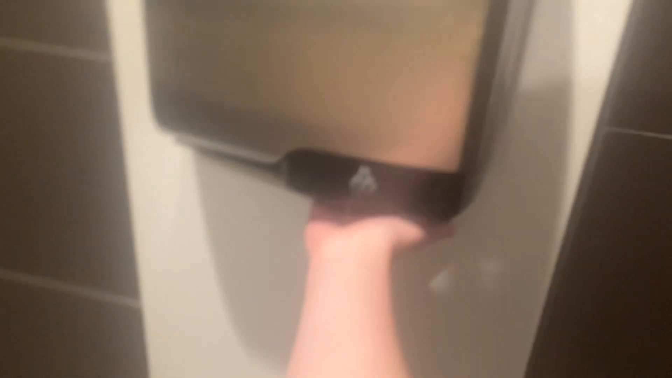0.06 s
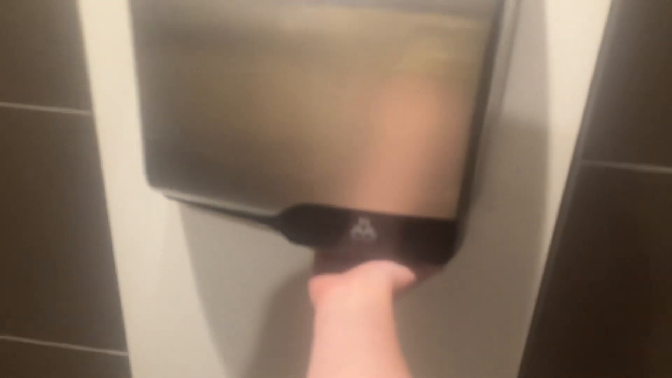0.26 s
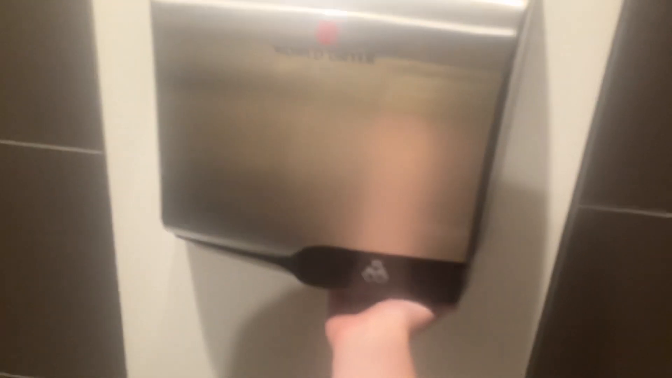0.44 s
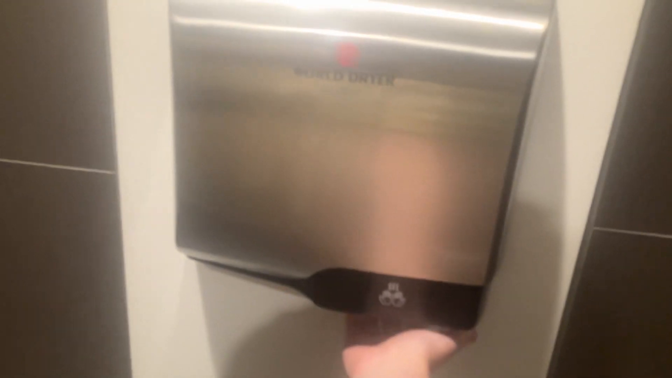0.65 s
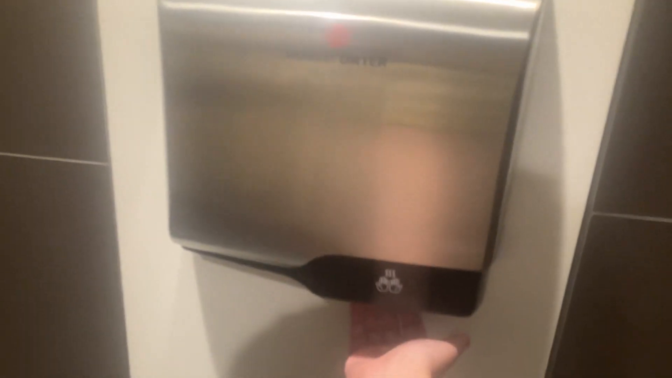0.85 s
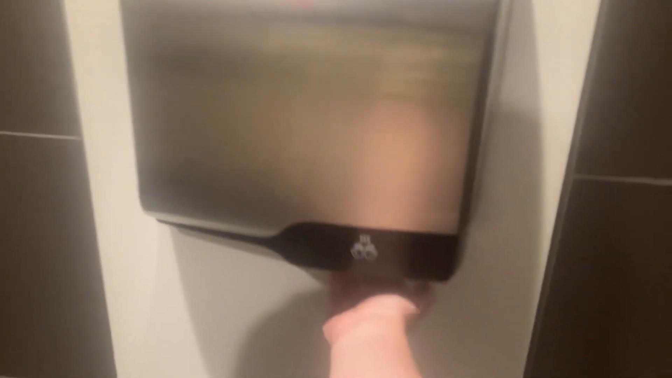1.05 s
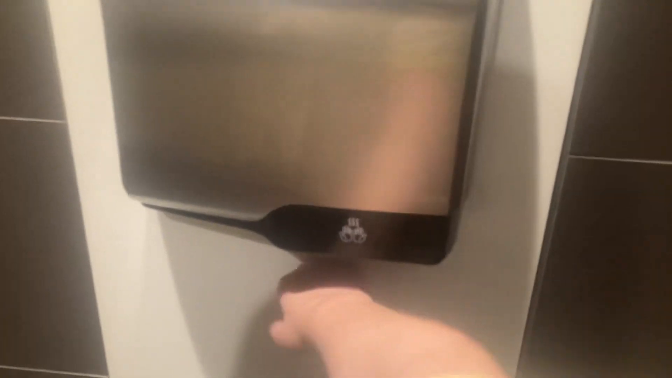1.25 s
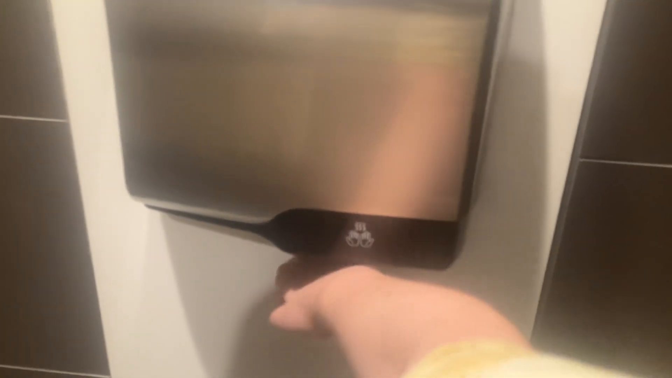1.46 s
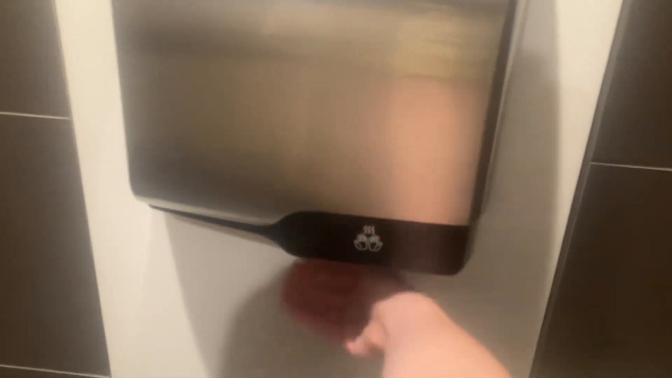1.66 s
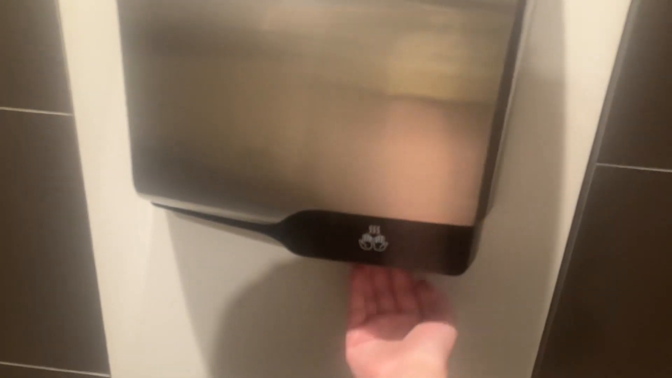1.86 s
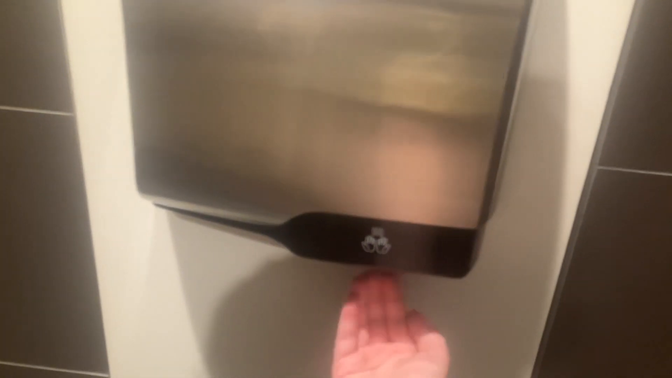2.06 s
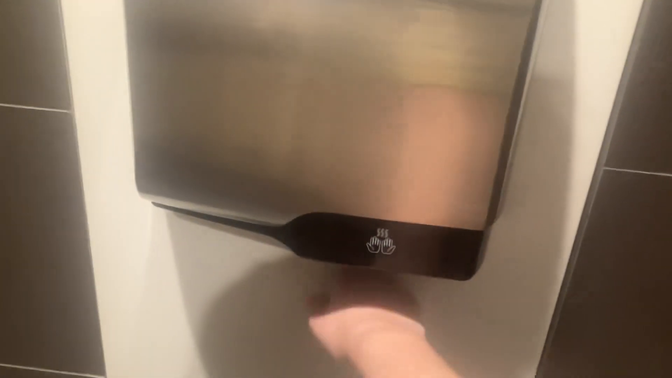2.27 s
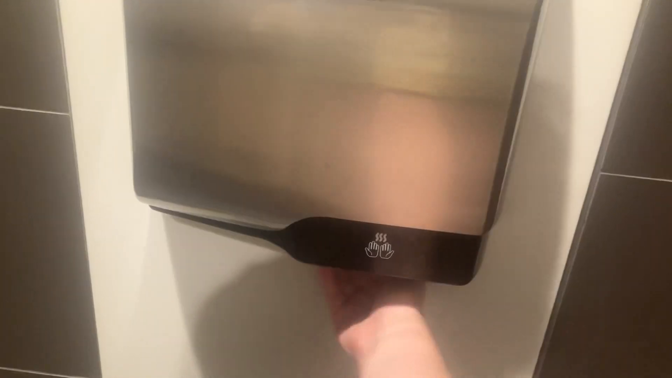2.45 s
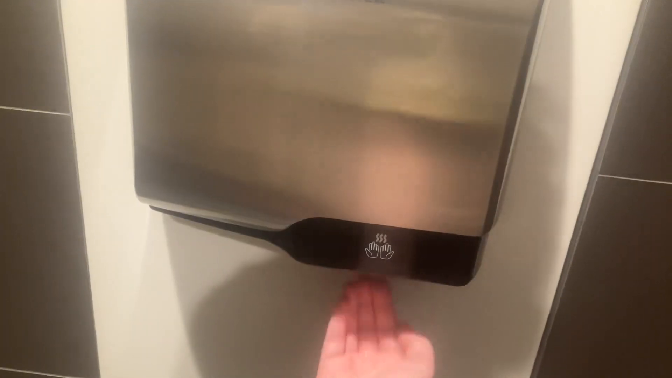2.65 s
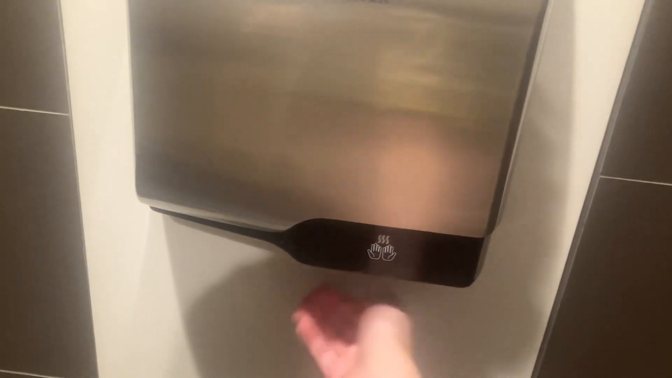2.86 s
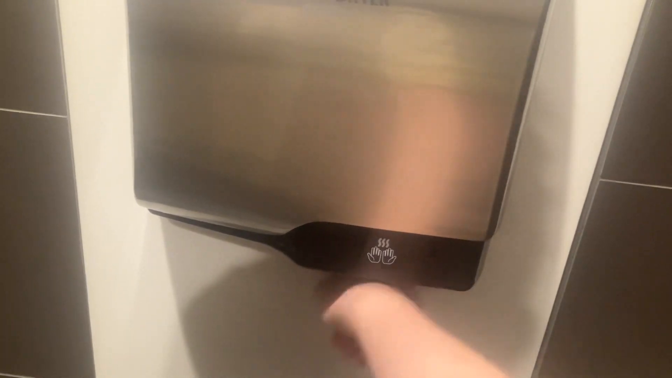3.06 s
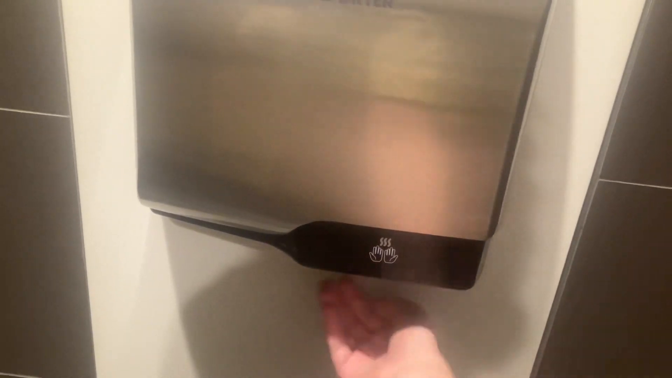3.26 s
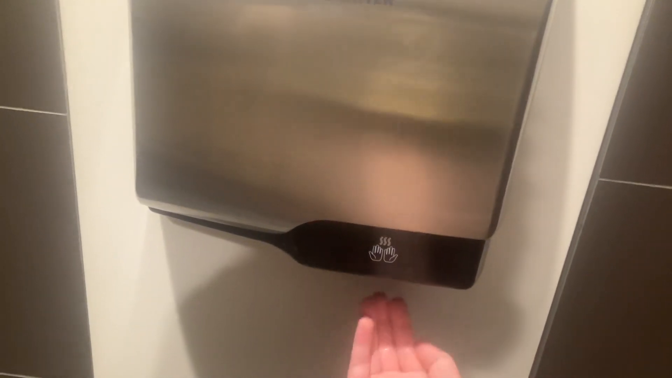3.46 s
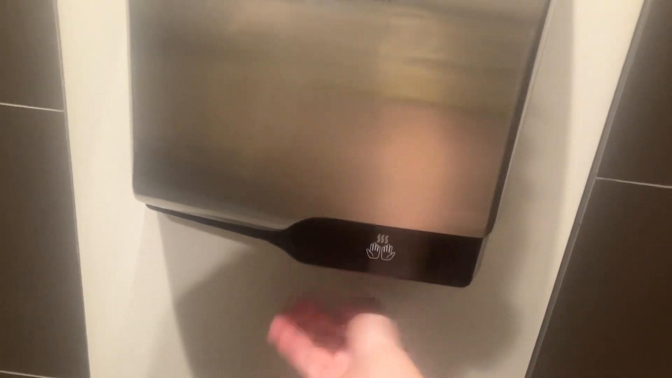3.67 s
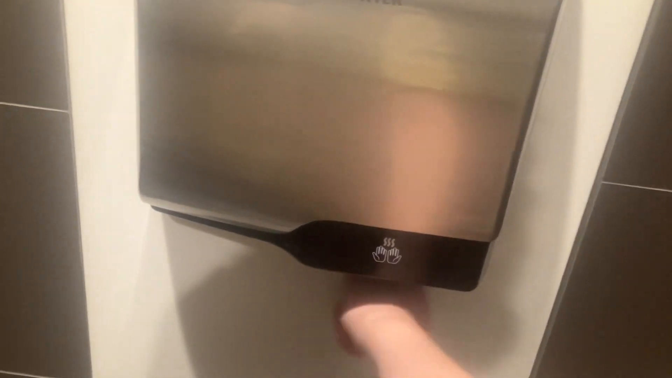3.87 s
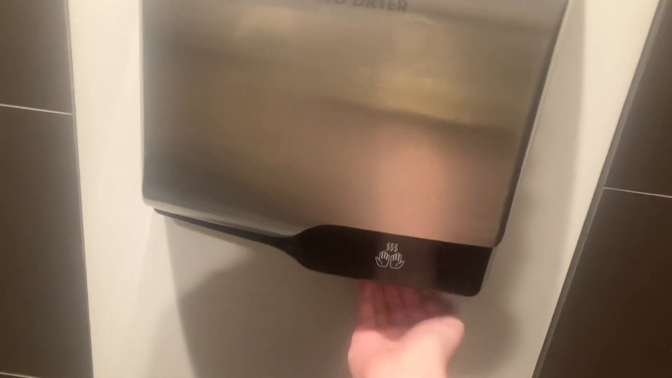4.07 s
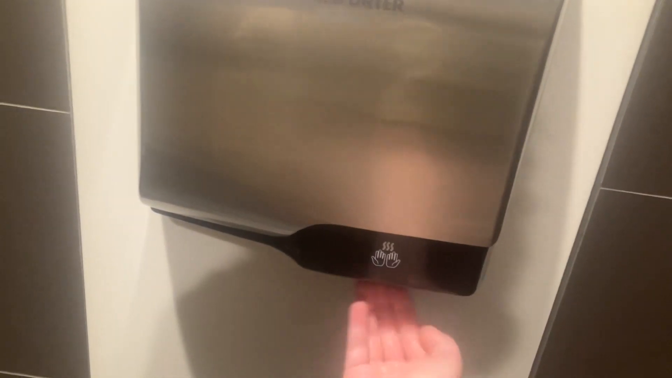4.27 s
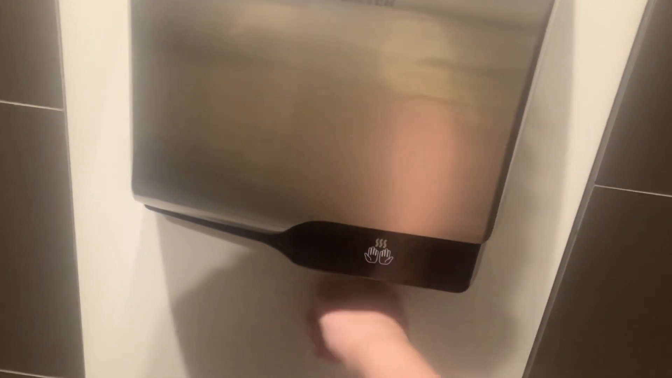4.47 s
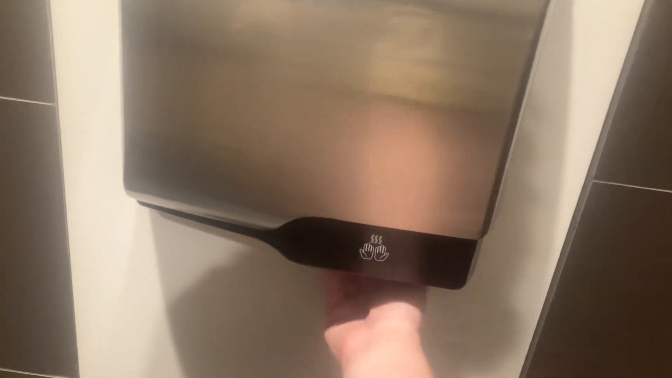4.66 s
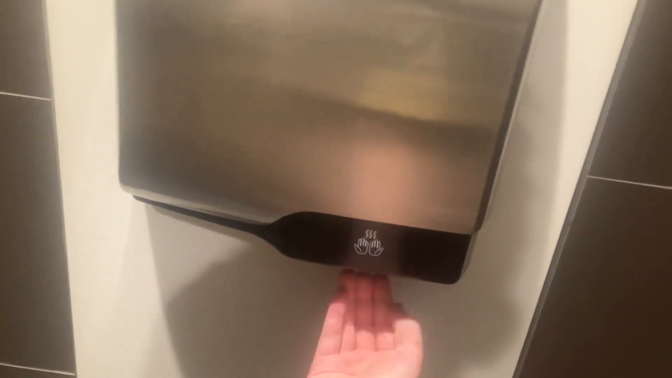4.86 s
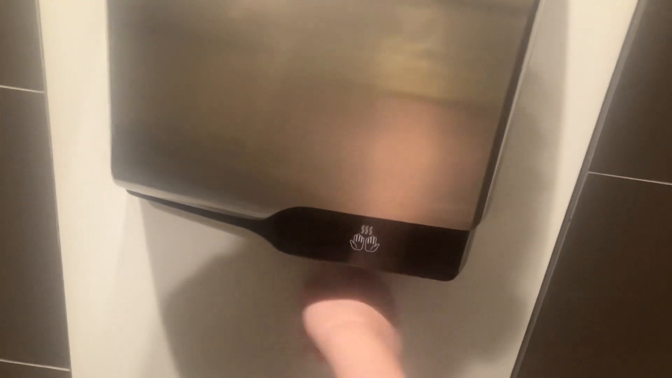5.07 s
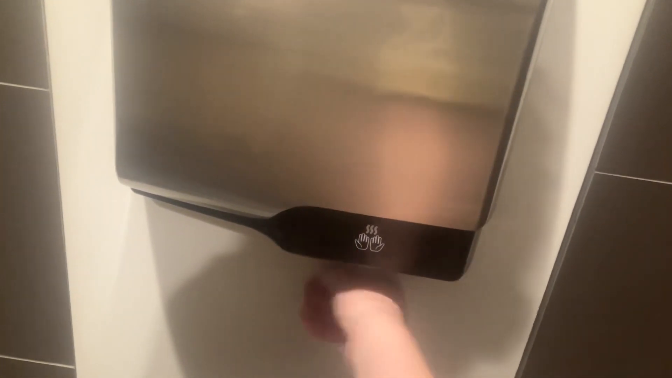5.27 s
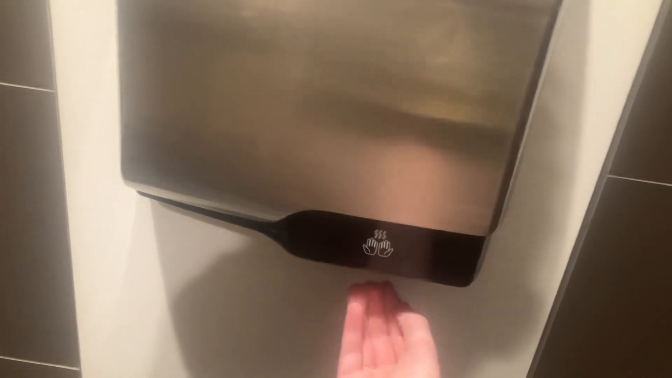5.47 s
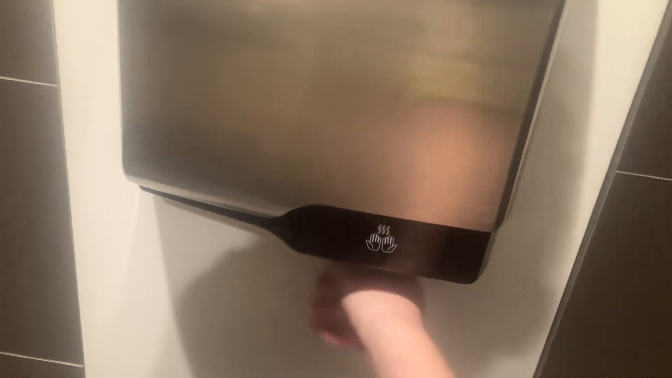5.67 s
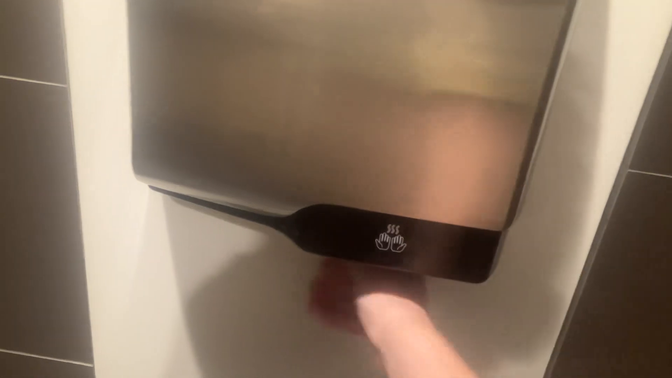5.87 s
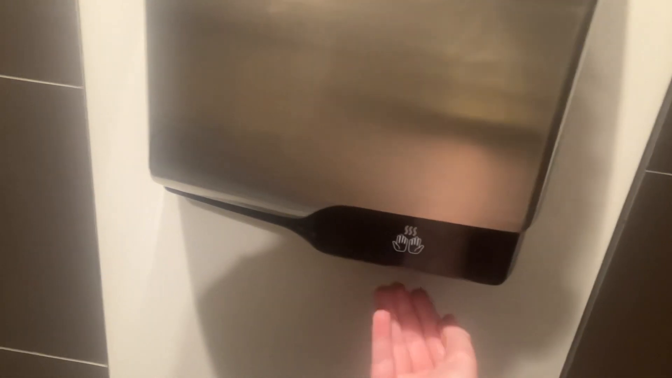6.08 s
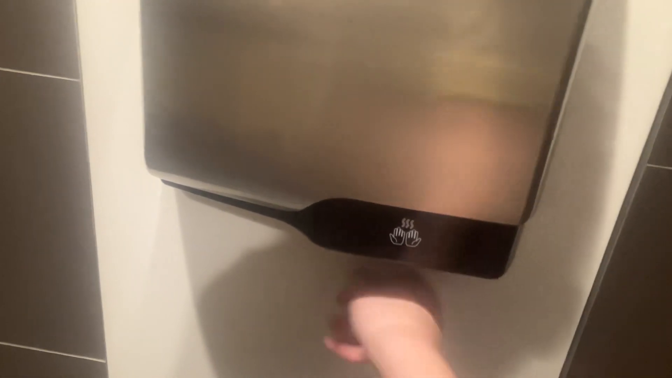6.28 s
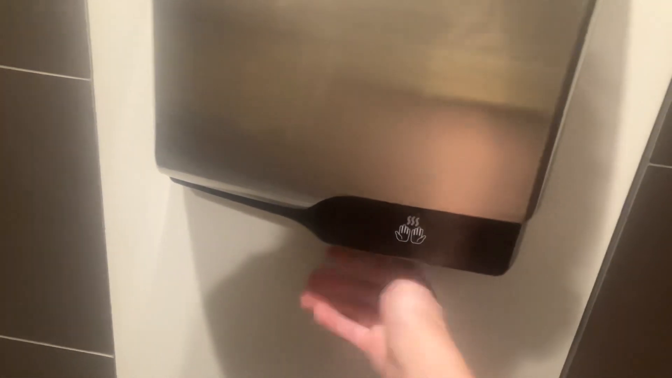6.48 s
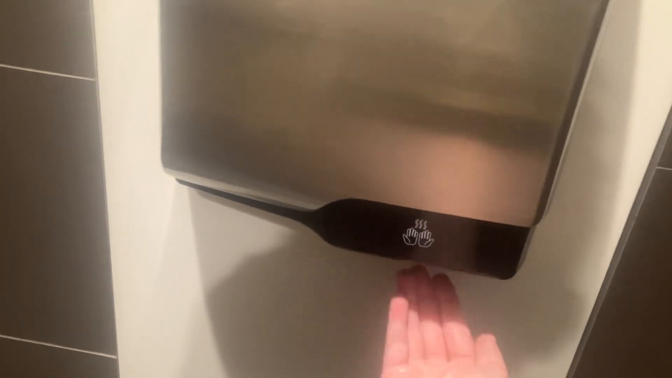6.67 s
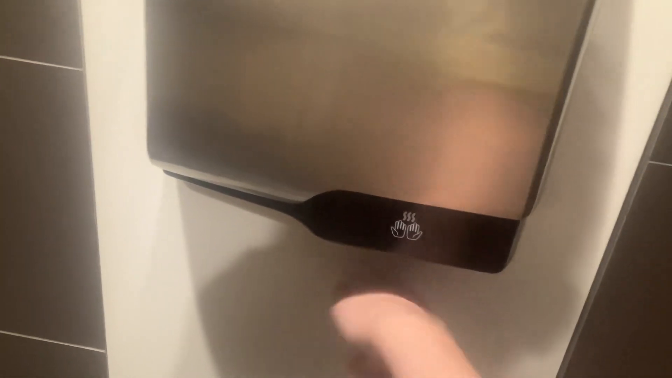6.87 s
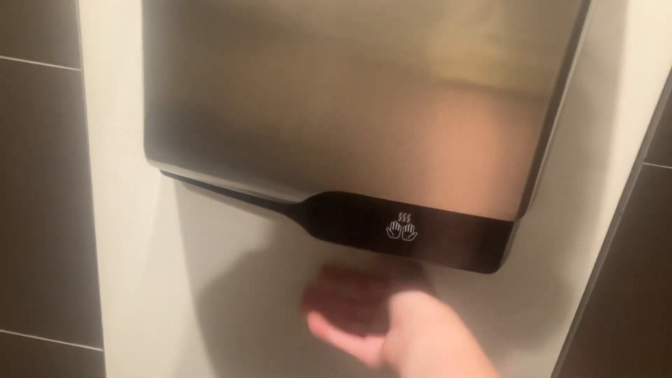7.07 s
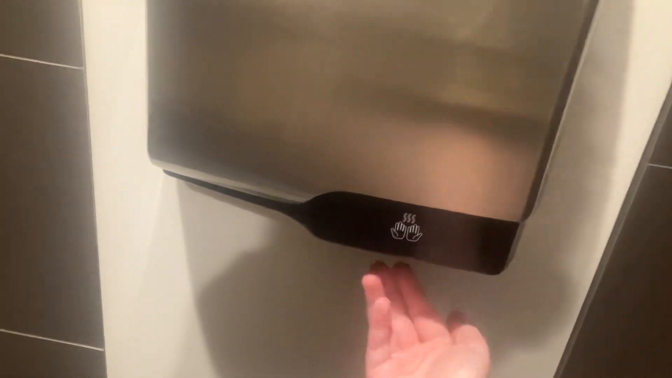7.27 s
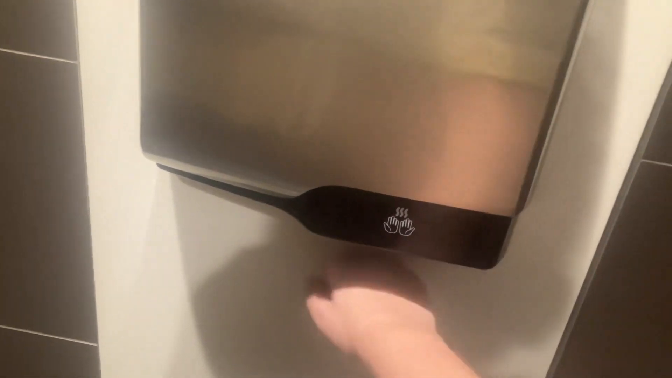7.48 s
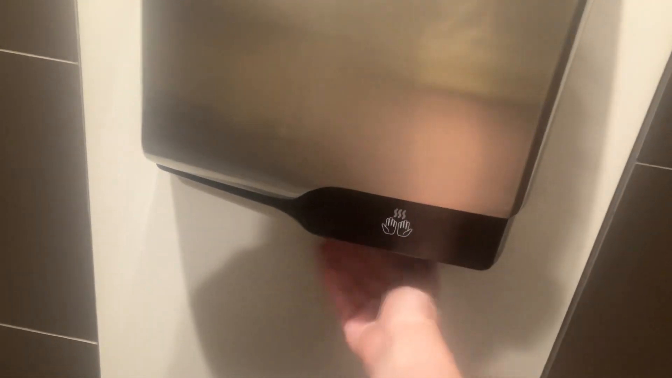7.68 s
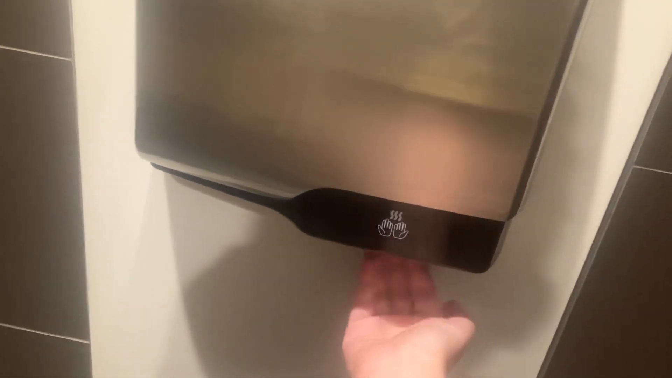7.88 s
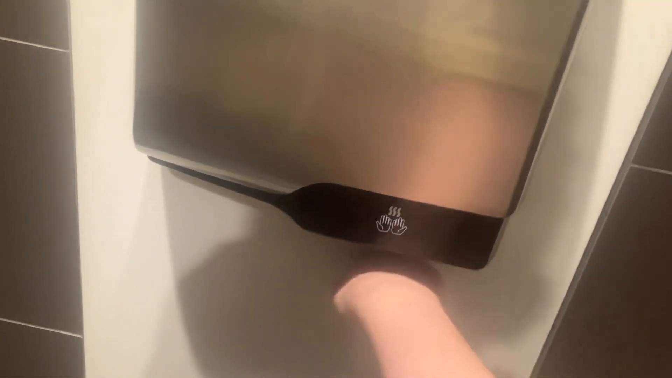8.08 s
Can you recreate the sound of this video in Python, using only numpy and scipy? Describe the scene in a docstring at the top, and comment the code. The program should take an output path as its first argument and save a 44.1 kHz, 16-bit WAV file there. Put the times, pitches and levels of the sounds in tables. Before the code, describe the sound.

A hand dryer clicks on and spins up, roaring and whining as a hand turns in its air jet in a tiled restroom.

```python
"""A vent hum, a short rustle and soft handling bumps in a tiled restroom; then a hand dryer starts up.
A hand moves under it, a relay clicks and the blower spins up, its whine ringing the duct on the way.
The air jet roars through the modes of the housing and the room. The impeller whines on two shaft
orders, swelling and fading as the hand turns in the jet and draws swishes and low booms from it."""
import sys
import numpy as np
from scipy import signal
from scipy.fft import rfft, irfft, next_fast_len
from scipy.io import wavfile
from scipy.ndimage import uniform_filter1d, map_coordinates

SR = 44100
rng = np.random.default_rng(int(sys.argv[2]) if len(sys.argv) > 2 else 0)


def dump(signal):
    """Clip the signal to [-1, 1] and save it as 16-bit WAV at the path in sys.argv[1]."""
    limited = np.clip(np.atleast_2d(signal).T, -1, 1)
    pcm = np.round(limited * 32767).astype(np.int16)
    wavfile.write(sys.argv[1], SR, pcm)


N = 358533
TIME_S = np.arange(N) / SR
RELAY_S, FULL_SHAFT_HZ = .459, 250.8
SIDES = np.array([[.5], [-.5]])  # splits a left-minus-right amount between the channels


def amp(db):
    """Decibels to gain."""
    return 10 ** (np.asarray(db) / 20)


def unit(x):
    """Scale to rms 1."""
    return x / np.sqrt(np.mean(x ** 2) + 1e-20)


def along(points, hz):
    """Read (frequency, value) points at hz, on a log frequency axis."""
    knots_hz, values = np.transpose(points)
    return np.interp(np.log(hz + 1), np.log(knots_hz + 1), values)


def curves(rows):
    """One automation curve for each column after the time."""
    times_s, *columns = np.transpose(rows)
    return [np.interp(TIME_S, times_s, column) for column in columns]


def wobble(per_s):
    """A smooth random curve with per_s knots a second."""
    knots = rng.standard_normal(int(N * per_s / SR) + 4)
    return map_coordinates(knots, [np.arange(N) * per_s / SR])


def swell(peak_s, length_s, squareness=2):
    """A rise and fall around peak_s, length_s wide at half height."""
    return .5 ** (np.abs(2 * (TIME_S - peak_s) / length_s) ** squareness)


def filtered(x, response):
    """Filter x by a complex response, given as a function of frequency."""
    size = next_fast_len(N + SR // 2)
    return irfft(rfft(x, size) * response(np.fft.rfftfreq(size, 1 / SR)), size)[..., :N]


def rush(colour, patchy_db):
    """Coloured stereo noise of rms 1, with patches of random gain in time and frequency."""
    # how alike left and right sound: frequency_hz, correlation
    likeness = [(60, 0.92), (150, 0.96), (300, 0.58), (600, 0.54), (1200, 0.26), (2400, 0.54),
                (5000, 0.061), (8000, 0.28)]

    def mid_side_gains(hz):
        angle = np.arccos(np.clip(along(likeness, hz), -1, 1)) / 2
        return amp(along(colour, hz)) * [np.cos(angle), np.sin(angle)]

    spectra = signal.stft(rng.standard_normal((2, N)), nperseg=1024)[2]
    patches = uniform_filter1d(rng.standard_normal(spectra.shape[1:]), size=10, axis=0)
    patches = uniform_filter1d(patches, size=12, axis=1)
    pair = signal.istft(spectra * amp(patchy_db * unit(patches)), nperseg=1024)[1][:, :N]
    mid, side = filtered(pair, mid_side_gains)
    return unit(np.array([mid + side, mid - side]))


def with_room(direct, send, wet_db):
    """Blend the direct sound with the tiles' diffuse stereo answer to the send."""
    # decay of the tiled room: frequency_hz, t60_s
    tiles = [(200, 0.92), (2000, 1), (9000, 1)]
    hz, age_s, spectra = signal.stft(rng.standard_normal((2, SR // 2)), SR, nperseg=256)
    decay = amp(-60 * age_s / along(tiles, hz)[:, None])
    tail = signal.istft(spectra * decay, SR, nperseg=256)[1]
    reverb = unit(signal.fftconvolve(send[None], tail, axes=1)[:, :N])
    wet = amp(wet_db)
    return (direct + wet * np.std(direct) * reverb) / np.hypot(1, wet)


def vent():
    """A vent hums on two wavering tones over a bed of soft air."""
    # colour of the quiet room with its vent: frequency_hz, density_db
    colour = [(20, -29), (60, 6.5), (150, -14), (250, -9), (500, -3), (900, -14), (2000, -17), (4000, -21),
              (5800, -23.5), (7600, -25.5), (9800, -60)]
    hum = sum(amp(db) * np.sin(2 * np.pi * hz * TIME_S + .53 * wobble(12))
              for hz, db in [(622, -48), (662, -48.5)])
    return hum + amp(-46.5) * rush(colour, patchy_db=2)


def fading_hiss():
    """A faint high hiss dies away at the start."""
    # colour of the hiss: frequency_hz, density_db
    colour = [(3000, -27), (5800, -11), (6700, -0.5), (7800, -3), (9000, -19), (9900, -33)]
    start_db, fade_db_per_s = -47.5, 42
    return amp(start_db - fade_db_per_s * TIME_S) * rush(colour, patchy_db=0)


def rustle():
    """A brief, soft rustle before the dryer starts."""
    # envelope of the rustle: time_s, level_db
    envelope = [(0, -51), (.09, -63), (.125, -37), (.2, -38), (.3, -42), (.45, -51), (.7, -99)]
    # its colour: frequency_hz, density_db
    colour = [(100, -26), (300, -5), (650, -0.5), (900, -6.5), (1400, -10.5), (1900, 0.5), (3200, -8),
              (4600, -7.5), (5600, -19), (9000, -44)]
    return amp(curves(envelope)[0]) * rush(colour, patchy_db=1)


def handling():
    """Low rumble and soft thuds from a shifting grip."""
    # handling thuds: peak_s, level_db, pitch_hz, half_width_s
    bumps = [(.01, -36.5, 296, 0.021), (0.047, -34, 47.5, 0.021), (0.13, -42, 68, 0.028),
             (.16, -36, 153, 0.016), (0.231, -26.5, 68.6, 0.015), (0.538, -30, 71.6, 0.013),
             (0.788, -39, 55.5, 0.035), (1.292, -33, 62, .025), (3.603, -36, 68, 0.044),
             (5.461, -36.5, 70, 0.029)]
    # envelope of the rumble: time_s, level_db
    envelope = [(0, -37.5), (.25, -40.5), (.37, -41), (.6, -32), (1, -52), (1.6, -52)]
    # its colour: frequency_hz, density_db
    colour = [(10, -33.5), (40, -9), (70, -1), (130, -7), (220, -19), (600, -69)]
    thuds = np.zeros(N)
    for peak_s, db, hz, half_width_s in bumps:
        offset_s = TIME_S - peak_s
        thuds += amp(db) * np.exp(-(offset_s / half_width_s) ** 2) * np.cos(2 * np.pi * hz * offset_s)
    return thuds + amp(curves(envelope)[0]) * rush(colour, patchy_db=2)


def relay():
    """The contacts strike and bounce: a sharp double tick with a short splash off the tiles."""
    # strike and bounce: start_s, level_db
    contacts = [(0.4603, -31), (.4637, -34.5)]
    # colour of the tick: frequency_hz, density_db
    colour = [(100, -15.5), (2800, 2), (3800, 0.5), (5100, -13), (5900, -6), (6700, 7.5), (7400, 4),
              (8100, 0.5), (9400, -11), (10000, -21)]
    crack_t60_s, splash_t60_s, splash_db = .02, .41, -8
    power = np.zeros(N)
    for start_s, db in contacts:
        age_s = np.maximum(TIME_S - start_s, 0)
        crack = amp(db - 60 * age_s / crack_t60_s)
        splash = amp(db + splash_db - 60 * age_s / splash_t60_s)
        power += (age_s > 0) * (crack ** 2 + splash ** 2)
    return np.sqrt(power) * rush(colour, patchy_db=4)


def booms():
    """At some angles of the hand the jet excites one low mode, which swells with a wavering ring."""
    # booming modes: peak_s, length_s, level_db, pitch_hz
    modes = [(1.247, 0.16, -36, 302), (2.02, 0.15, -32.5, 614), (2.1, 0.13, -32.5, 180),
             (2.88, 0.27, -41, 297.7), (3.206, 0.11, -34.5, 300), (3.668, .22, -39.5, 110),
             (4.1, .15, -42, 112), (4.38, 0.5, -37.5, 616), (4.686, 0.13, -33.5, 299.7),
             (4.88, 0.28, -37, 186), (6.3, .15, -37.5, 250), (6.62, .15, -33, 301)]
    wander_rad = .9
    rings = np.zeros(N)
    for peak_s, length_s, db, hz in modes:
        phase = 2 * np.pi * hz * TIME_S + wander_rad * wobble(per_s=18)
        rings += amp(db) * swell(peak_s, length_s) * np.sin(phase)
    return np.sqrt(2) * rings * amp([[-1], [1]])  # leaning right


def swishes():
    """The hollow of the hand resonates in the jet, at a pitch set by how it is cupped."""
    # strokes of the cupped hand: peak_s, length_s, level_db, pitch_hz
    strokes = [(1.37, .12, -32, 2060), (1.583, 0.49, -35, 2600), (1.7, 0.11, -33, 2060),
               (2.05, .2, -37, 2550), (2.32, 0.12, -32.5, 2020), (2.414, 0.11, -32.5, 2520),
               (4.07, 0.087, -36, 2080), (4.753, 0.1, -32, 2040), (5.17, 0.15, -29.5, 2045),
               (5.53, 0.17, -31.5, 1334), (5.517, 0.077, -38, 2300), (5.754, .21, -33.5, 2364),
               (6.4, 0.32, -34, 2096), (7.047, .16, -35, 2140), (7.58, 0.19, -37, 2110),
               (7.92, .12, -38, 2060), (8.107, 0.098, -33.5, 2060)]
    width_hz = 380
    turbulence = np.array([wobble(width_hz) + 1j * wobble(width_hz) for side in range(2)])
    turbulence = turbulence + .3 * turbulence[::-1]  # crossfeed narrows the image
    resonance = sum(amp(db) * swell(peak_s, length_s) * np.exp(2j * np.pi * hz * TIME_S)
                    for peak_s, length_s, db, hz in strokes)
    return np.real(turbulence * resonance) / np.std(turbulence.real)


def running(rise_s):
    """0 until the relay closes, then rising to 1."""
    return np.clip((TIME_S - RELAY_S) / rise_s, 0, 1)


def shaft_speed():
    """Turns a second: a quick kick when the relay closes, then an exponential approach to full speed."""
    kick_hz, kick_s, approach_hz, approach_s = 58, .106, 165, .25
    age_s = np.maximum(TIME_S - RELAY_S, 0)
    shortfall_hz = approach_hz * np.exp(-age_s / approach_s) + kick_hz * np.exp(-(age_s / kick_s) ** 2)
    return FULL_SHAFT_HZ - shortfall_hz


def spin_up():
    """Until the flow settles the blade tone is a rough band; each duct resonance it passes rings on."""
    # the whine climbing through the housing's resonances: time_s, level_db
    sweep = [(.495, -60), (.52, -44), (.545, -44), (.562, -38), (.578, -39), (.595, -24.5), (.612, -34),
             (.636, -25.5), (.655, -38), (.71, -39), (.755, -31), (.795, -21.5), (.83, -26), (.87, -34),
             (.93, -29.5), (.97, -42), (1.15, -52), (1.3, -90)]
    # duct resonances: pitch_hz, level_db, t60_s
    duct = [(2040, -44, .3), (2680, -35, .32), (3470, -33, .4), (3900, -34, .3), (4830, -27, .25)]
    width_hz, attack_s = 480, .004
    blade_hz = 24 * shaft_speed()
    phase = 2 * np.pi * np.cumsum(blade_hz) / SR
    band = (1 + wobble(width_hz)) * np.sin(phase) + wobble(width_hz) * np.cos(phase)
    direct = amp(curves(sweep)[0]) * unit(band) * running(rise_s=.03)
    for hz, db, t60_s in duct:
        passed_s = TIME_S[np.argmax(blade_hz >= hz)]
        age_s = np.maximum(TIME_S - passed_s, 0)
        envelope = amp(db - 60 * age_s / t60_s) * (1 - np.exp(-age_s / attack_s))
        direct += np.sqrt(2) * envelope * np.sin(2 * np.pi * hz * TIME_S + .7 * wobble(90))
    return with_room(direct, send=direct, wet_db=-7)


def swelling(swells, rest_db):
    """Level in dB of a tone swelling from rest; moving air makes it flicker, more so during spin-up."""
    rest_flicker_db, swell_flicker_db, unsettled_flicker_db = 3.8, 1.5, 2.4
    flicker = np.minimum(wobble(per_s=17), 1)
    unsettled = np.minimum((1 - shaft_speed() / FULL_SHAFT_HZ) / .006, 1)  # 0 at full speed
    unsettled_db = unsettled_flicker_db * unsettled * np.minimum(wobble(per_s=40), 1)
    rest = amp(rest_db + rest_flicker_db * flicker)
    swell_power = sum((amp(db) * swell(peak_s, length_s, squareness=2.4)) ** 2
                      for peak_s, length_s, db in swells)
    swell_gain = amp(swell_flicker_db * flicker + unsettled_db)
    return 10 * np.log10(rest ** 2 + swell_power * swell_gain ** 2)


def shaft_tone(shaft_hz, level_db, order, flutter, wet_db, flutter_per_s=70):
    """One shaft order, shaken by inflow turbulence; moving air scrambles the phase of its reflections."""
    phase = 2 * np.pi * order * np.cumsum(shaft_hz) / SR
    gain = amp(level_db) * running(rise_s=.03)
    turbulence = wobble(flutter_per_s) * np.sin(phase) + wobble(flutter_per_s) * np.cos(phase)
    direct = gain * (np.sin(phase) + flutter * turbulence) / np.sqrt(.5 + flutter ** 2)
    scrambled = gain * np.sin(phase + 1.7 * wobble(9))
    return with_room(direct, scrambled, wet_db)


def impeller():
    """The impeller sings on multiples of its shaft rate: a whine and a whistle over a hum and a drone."""
    # the whine swells as the hand turns: peak_s, length_s, level_db
    whine_swells = [(1.15, .1, -23), (1.235, 0.076, -23.5), (1.31, 0.11, -29), (1.405, 0.026, -29.5),
                    (1.5, 0.12, -24), (1.595, 0.055, -22), (1.72, .07, -26.5), (1.79, .05, -26),
                    (2, .12, -32), (2.13, 0.072, -35), (2.29, 0.055, -29), (2.39, 0.059, -41),
                    (2.5, .048, -33), (2.87, .12, -30), (2.98, 0.053, -30), (3.33, 0.067, -24),
                    (3.45, 0.037, -37.5), (3.6, 0.1, -35), (3.69, 0.042, -32.5), (3.82, 0.047, -40),
                    (4.05, 0.067, -34), (4.25, 0.13, -38), (4.5, .1, -38.5), (4.63, .08, -43.5),
                    (4.76, .06, -28.5), (4.93, .13, -26.5), (5.1, .09, -30), (5.35, 0.11, -26),
                    (5.49, 0.23, -22.5), (5.67, 0.11, -24.5), (5.78, 0.11, -32.5), (5.96, 0.22, -32.5),
                    (6.19, 0.12, -28), (6.345, .1, -29.5), (6.58, 0.08, -29), (6.68, 0.12, -29),
                    (6.83, 0.079, -31), (6.91, 0.11, -31.5), (7.02, .08, -31.5), (7.17, 0.12, -30.5),
                    (7.36, 0.069, -31), (7.51, 0.15, -27.5), (7.66, 0.049, -31.5), (7.835, 0.13, -26.5),
                    (7.94, 0.038, -32), (8.08, 0.13, -34)]
    # the lower whistle flares in between: peak_s, length_s, level_db
    whistle_swells = [(1.83, .08, -31), (2.18, .09, -28.5), (3.53, .11, -35), (4.07, .14, -31.5),
                      (4.38, .14, -29.5), (4.63, .1, -35), (4.76, .06, -36), (5.13, .07, -36),
                      (5.7, .06, -38), (7.43, .14, -35.5)]
    # both tones between swells, at full speed: time_s, whine_db, whistle_db
    rests = [(1, -45, -38), (1.5, -41, -35), (1.87, -53, -34), (2.1, -41.5, -37), (2.8, -42, -36),
             (3.2, -42, -40), (3.7, -43, -38), (4.5, -38, -39), (4.7, -49, -40), (5.25, -52, -43),
             (5.8, -40, -41), (6.5, -45.5, -40), (6.9, -37.5, -40.5), (7.4, -40, -40), (7.72, -47, -42.5),
             (8.1, -38, -41)]
    # hum at the shaft rate: time_s, level_db
    hum_envelope = [(.46, -60), (.52, -45), (.6, -39), (.7, -34), (.82, -35), (1, -36.5), (1.5, -32.5),
                    (1.88, -34), (2.3, -43), (8.13, -43.5)]
    shaft_hz = shaft_speed() * (1 + .000438 * wobble(5) + .00032 * wobble(30))
    speed_db = 60 * np.log10(shaft_hz / shaft_hz.max())  # amplitude grows as speed cubed
    whine_rest_db, whistle_rest_db = curves(rests)
    whine_db = swelling(whine_swells, whine_rest_db + speed_db)
    whine = shaft_tone(shaft_hz, whine_db, order=24, flutter=.25, wet_db=-15)
    whistle_db = swelling(whistle_swells, whistle_rest_db + speed_db)
    whistle = shaft_tone(shaft_hz, whistle_db, order=20, flutter=.62, wet_db=-7, flutter_per_s=130)
    hum = shaft_tone(shaft_hz, curves(hum_envelope)[0], order=1, flutter=.22, wet_db=-9)
    drone = shaft_tone(shaft_hz, -60.5 + speed_db, order=4, flutter=.88, wet_db=-8.5)
    return (whine + whistle) * amp([[.6], [-.6]]) + hum + drone


def housing_modes(hz):
    """Standing waves lift or sink narrow bands, each with its own place between left and right."""
    # peaks and dips of housing and room: centre_hz, width_hz, gain_db, left_minus_right_db
    modes = [(74, 12, 4.5, 0), (109.6, 9, 7, -3), (181.4, 15.2, 7.5, -8), (252.7, 23, 5.5, -5.5),
             (302.7, 18, 7.5, -1.5), (343, 11, -3, -5.5), (423, 12, -3.5, -9), (477, 32, -7.5, 11),
             (504, 22, -3, -2), (555, 41, 0, 12.5), (611.8, 23.5, 7.5, -4.5), (649, 39, 5.5, -3),
             (773, 21, 2, -9.5), (887, 28, 4, -9), (983, 20, -1.5, 1.5), (1102, 39, 7, 4),
             (1295, 125, 5, -1.5), (1443, 53, 8, 1), (1880, 750, 1, 0), (2055, 90, 6, -1.5),
             (2487, 26, 2.5, -12), (2590, 83, -6.5, 0.5), (2633, 23, 6.5, -3.5), (3480, 78, 7.5, -7.5),
             (3768, 67, 4, 6), (4390, 160, 5, -5.5), (4735, 290, 3, 6), (5130, 200, 4.5, -7)]
    return amp(sum((db + SIDES * pan_db) * np.exp(-(2 * (hz - centre_hz) / width_hz) ** 2)
                   for centre_hz, width_hz, db, pan_db in modes))


def wall_comb(hz, spacing_hz, depth_db):
    """Close walls comb the upper spectrum into many fine peaks, a separate set on each side."""
    knots = rng.standard_normal((2, SR // 8))
    ripple = np.array([map_coordinates(row, [hz / spacing_hz], mode="wrap") for row in knots])
    return amp(depth_db * ripple * hz ** 2 / (hz ** 2 + 700 ** 2))


def standing_waves(air):
    """Housing and walls colour the air; their peaks drift as the hand moves between three poses."""
    hand = np.clip(wobble(per_s=2.5), -1, 1)
    out = np.zeros((2, N))
    for pose in (-1, 0, 1):
        detune = 1 + .003 * pose
        colour = lambda hz: housing_modes(hz * detune) * wall_comb(hz, spacing_hz=26, depth_db=2.7)
        crossfade = np.maximum(1 - np.abs(hand - pose), 0)
        out += crossfade * filtered(air, colour)
    return out


def jet():
    """Turbulent air roars louder with shaft speed; the turning hand lifts and dips its lower registers."""
    # broad colour of the jet: frequency_hz, density_db
    colour = [(12, -61.5), (25, -40), (55, -14.5), (150, -5), (300, 0.0), (700, -2.5), (1400, -4.5),
              (2700, -1), (3300, -7.5), (4700, -6.5), (5600, -16.5), (6500, -15.5), (7900, -17.5),
              (9000, -28.5), (9900, -43.5)]
    # the blast at full speed, loud at first and then settling: time_s, level_db
    blast = [(1.1, -18), (1.23, -20.5), (1.85, -22.5), (2.11, -21.5), (2.22, -24.5), (3.85, -26),
             (4.04, -25.5), (8.05, -27)]
    # rumble, roar, splash on the hand, rush and nozzle hiss: offset_db, speed_exponent
    registers = [(-6.5, 3.2), (0.25, 2.95), (-6, 2.35), (-7, 3.4), (-13, 4.1)]
    # the hand catches the jet: peak_s, length_s, rumble_lift_db, roar_lift_db, splash_lift_db,
    # rush_lift_db
    gusts = [(0.967, 0.62, 0, 0.2, -0.5, 2), (1.325, 0.3, -1, 1, 2.5, -2), (1.556, 0.19, -2, -0.5, 0, 0.5),
             (1.697, 0.09, -0.5, -1, 1.5, -0.5), (1.942, 0.18, 2, 0.5, -1.5, -0.5),
             (2.098, 0.13, 3, 0, -0.5, -1.5), (2.824, 0.2, 3.2, .5, -2.5, 1),
             (3.227, 0.094, 0, -2.5, 1, -0.5), (3.48, 0.36, 1, -0.2, -1, 2),
             (4.075, 0.065, -4, 0, 1.5, 2.5), (4.394, 0.51, -0.7, 0.8, 1, 0), (4.85, 0.21, 1.5, 1, 3.5, -1),
             (5.544, 0.14, 2, 0.5, 4.5, 0), (6.36, 0.48, -0.5, 1.5, -1, -0.5),
             (7.082, 0.07, 4.5, -0.5, 0.5, 0.5), (7.297, 0.15, 2, 0.7, -.5, 1.3),
             (7.75, 0.2, 0.5, 0.5, 1.5, 0)]
    bands_hz = [(100, 450), (450, 1600), (1600, 3000), (3000, 4700), (6400, 9500)]
    centres_hz = [250, 900, 2200, 4200, 7000]
    air = standing_waves(rush(colour, patchy_db=.9))
    blast_db = curves(blast)[0]
    speed_db = 20 * np.log10(shaft_speed() / FULL_SHAFT_HZ)
    lifts_db = np.zeros((len(registers), N))
    for peak_s, length_s, *lift_db in gusts:
        lifts_db[:len(lift_db)] += np.outer(lift_db, swell(peak_s, length_s))
    out = np.zeros((2, N))
    for i, (offset_db, speed_exponent) in enumerate(registers):
        sway_db = .3 * wobble(per_s=7)
        level_db = blast_db + offset_db + speed_exponent * speed_db + lifts_db[i] + sway_db
        low_hz, high_hz = bands_hz[i]
        band_rms = np.std(filtered(air, lambda hz: (hz > low_hz) & (hz < high_hz)))
        crossover = [(hz, float(hz == centres_hz[i])) for hz in centres_hz]
        out += amp(level_db) / band_rms * filtered(air, lambda hz: along(crossover, hz))
    return out * running(rise_s=.033)


def scene():
    """The dryer and the hand in its jet, over the small sounds of the restroom."""
    dryer = jet() + swishes() + booms() + spin_up() + impeller() + relay()
    return dryer + handling() + vent() + fading_hiss() + rustle()


def record(dry):
    """The left side arrives slightly later and brighter; the very top of the treble is cut."""
    # stereo tilt: frequency_hz, left_minus_right_db
    balance = [(60, 0.5), (180, -0.5), (550, 0.9), (1300, 3), (2500, 1.5), (5000, 1.5), (7000, 5),
               (8500, 16)]
    lag_s, top_hz = 4e-5, 10100

    def response(hz):
        delay = np.exp(-2j * np.pi * hz * SIDES * lag_s)
        return amp(SIDES * along(balance, hz)) * delay * (hz < top_hz)

    return filtered(dry, response)


dry = scene()
out = record(dry)
dump(out)
```